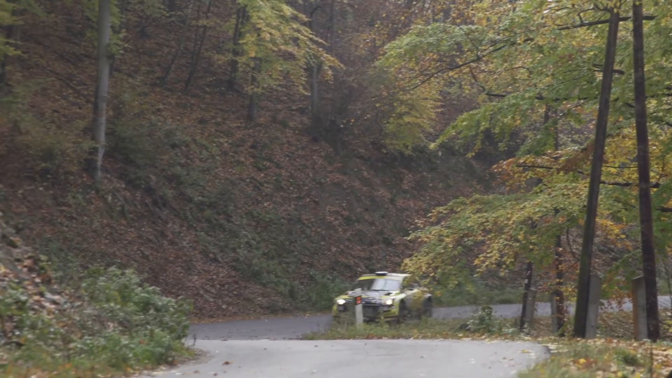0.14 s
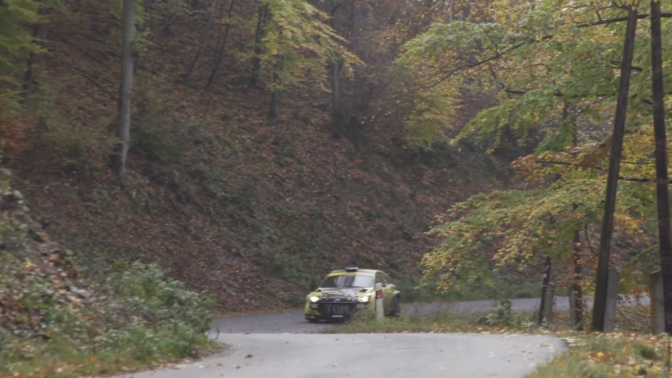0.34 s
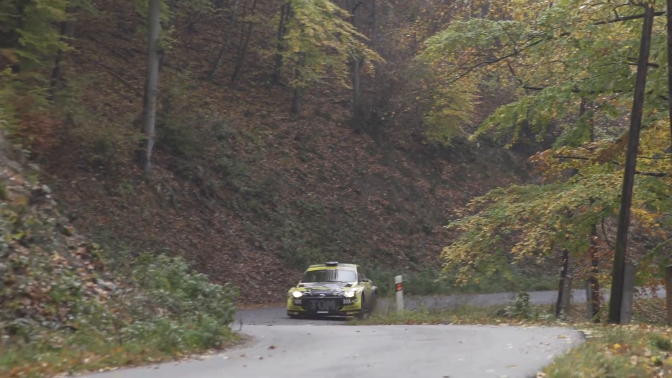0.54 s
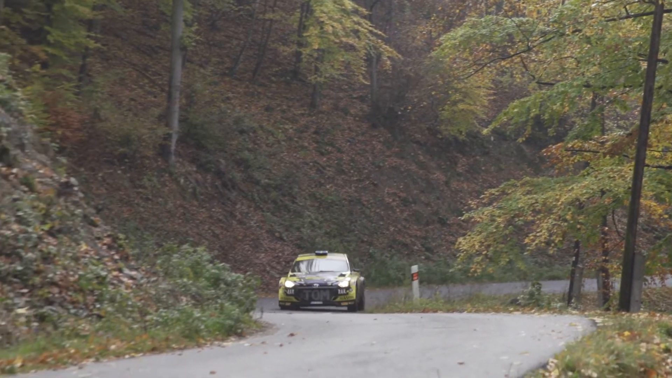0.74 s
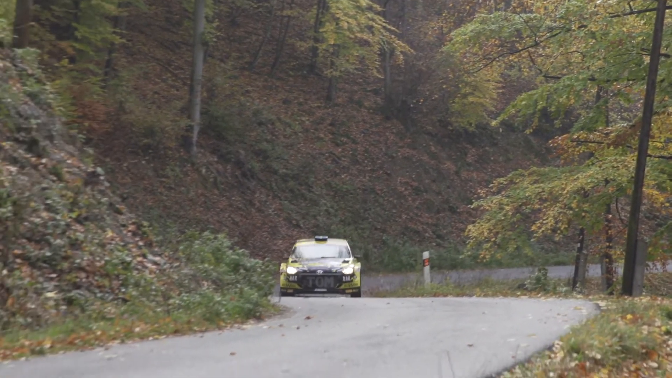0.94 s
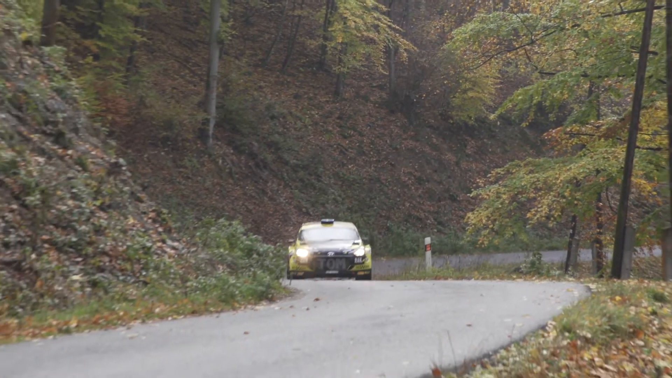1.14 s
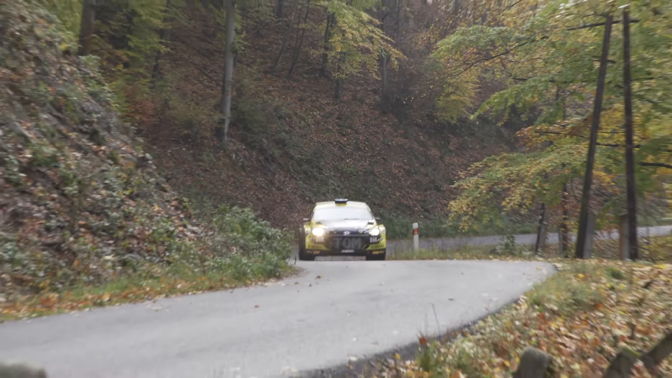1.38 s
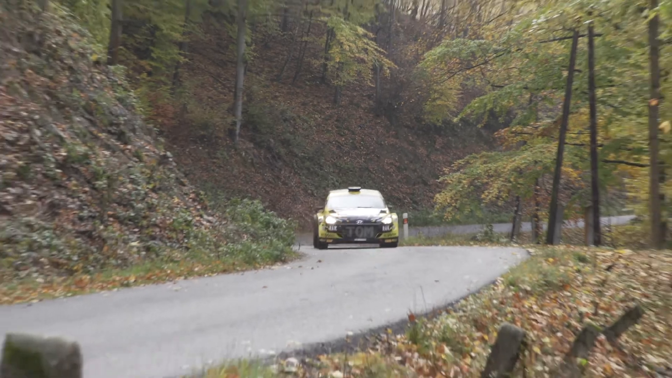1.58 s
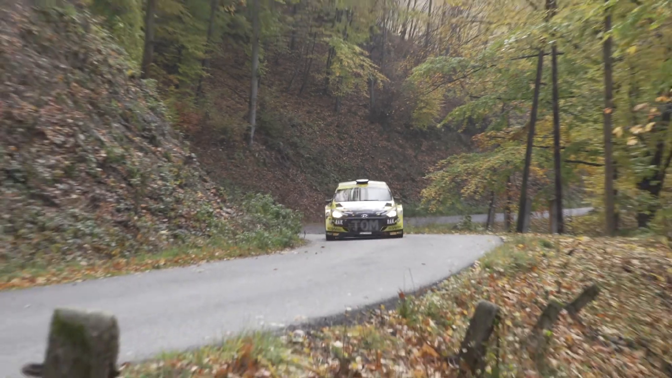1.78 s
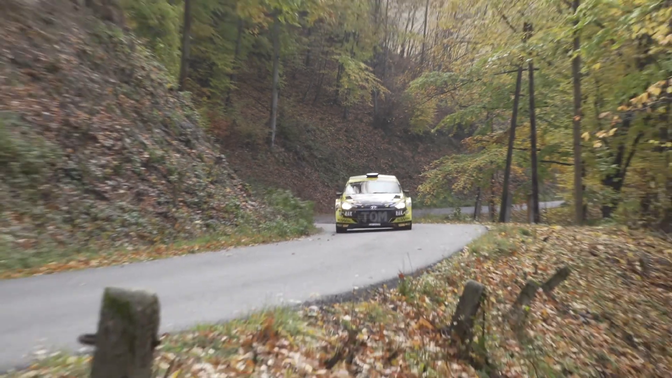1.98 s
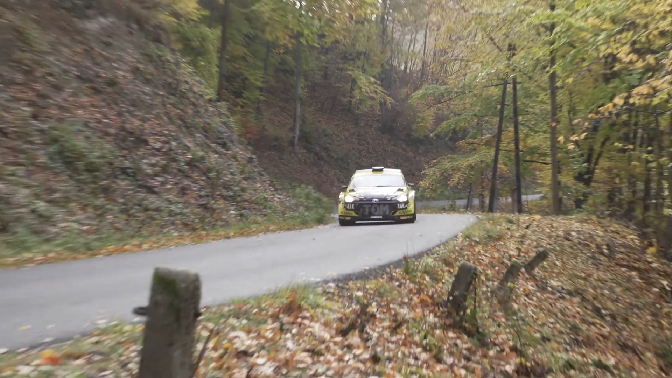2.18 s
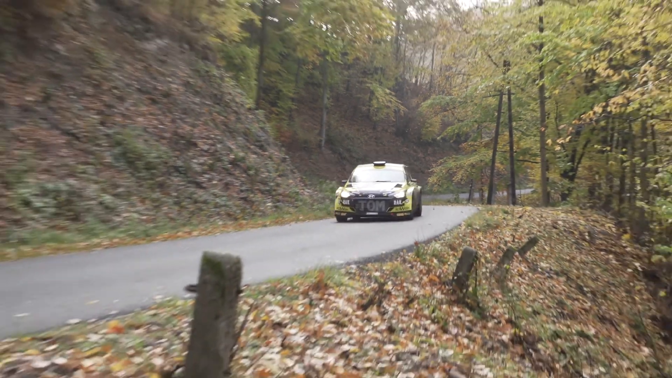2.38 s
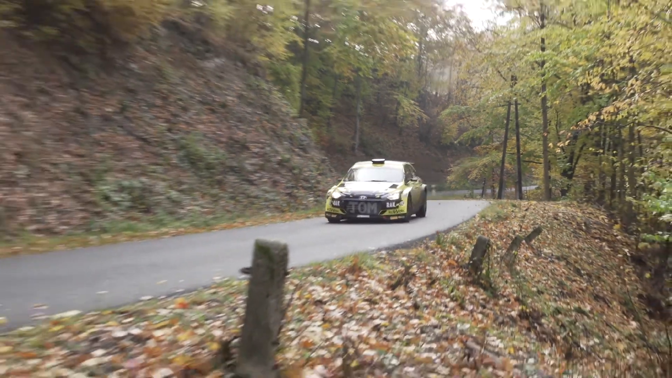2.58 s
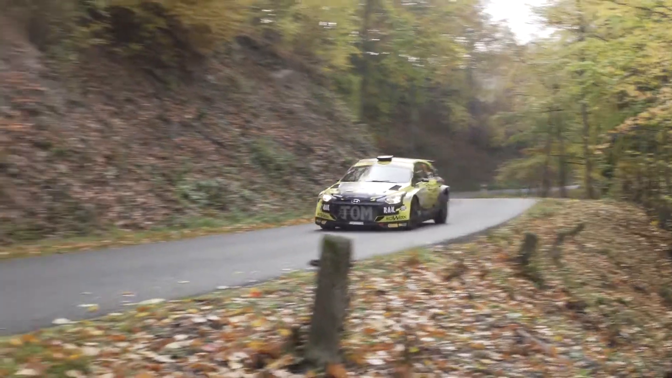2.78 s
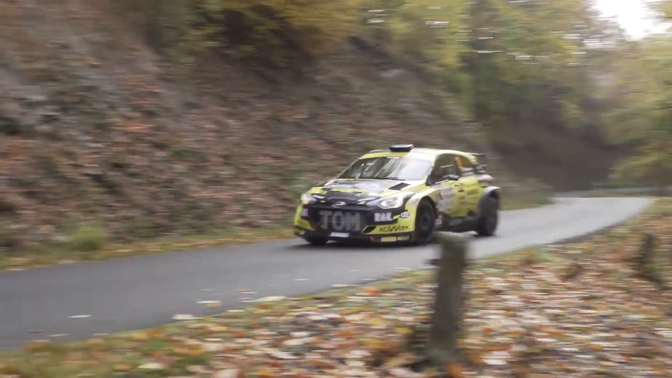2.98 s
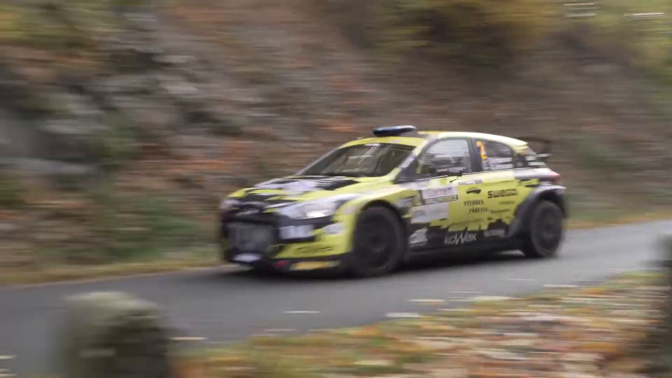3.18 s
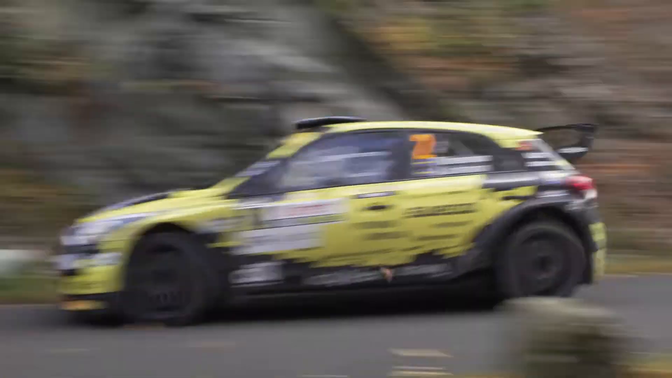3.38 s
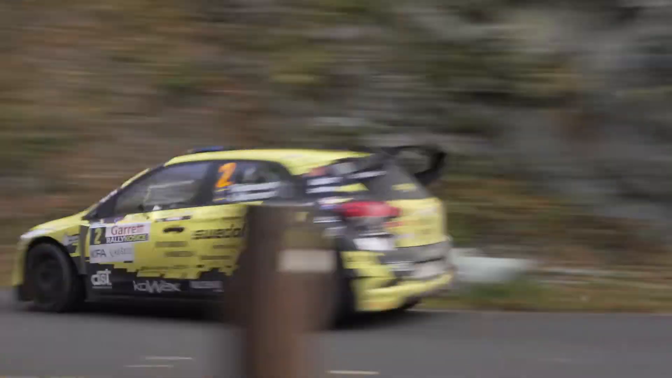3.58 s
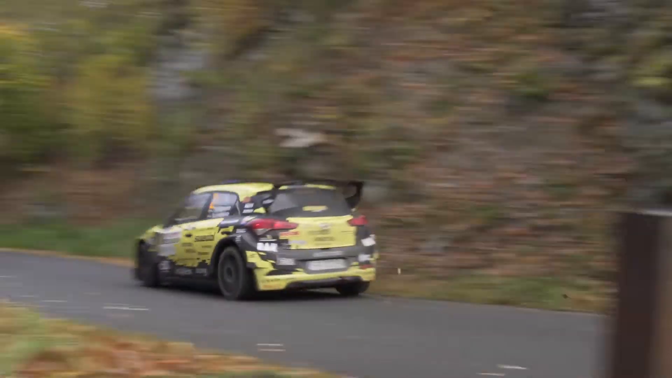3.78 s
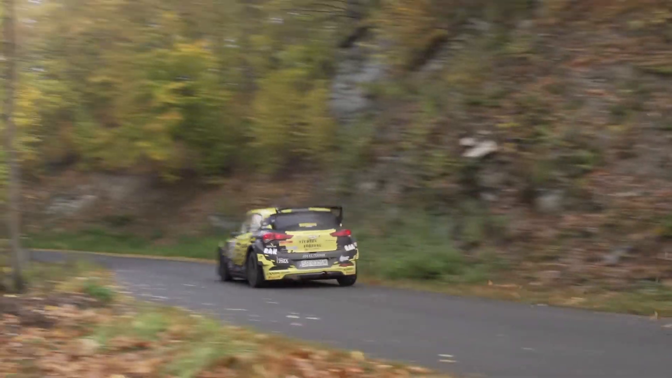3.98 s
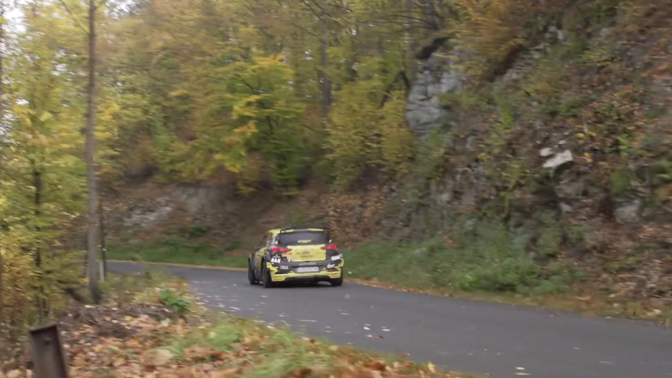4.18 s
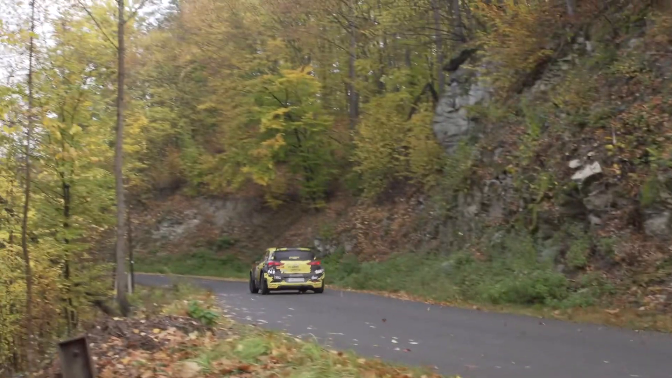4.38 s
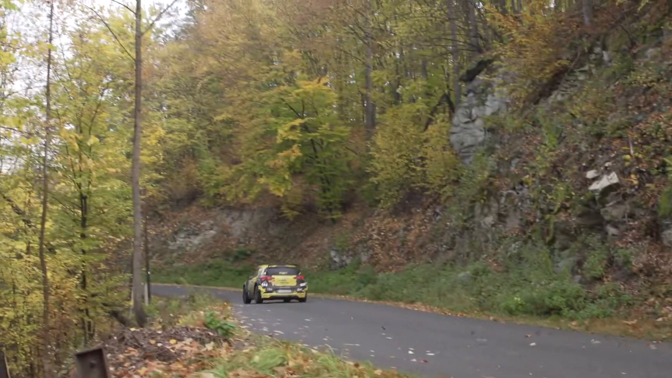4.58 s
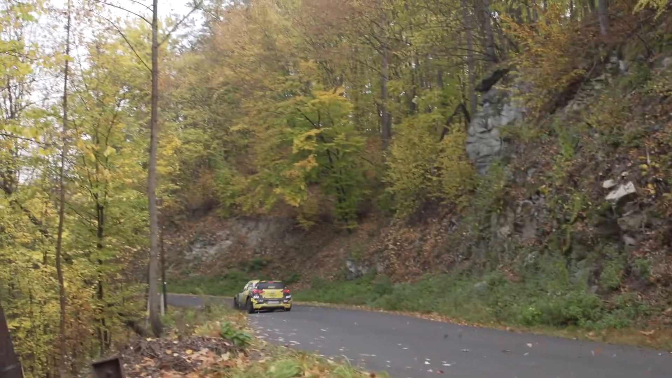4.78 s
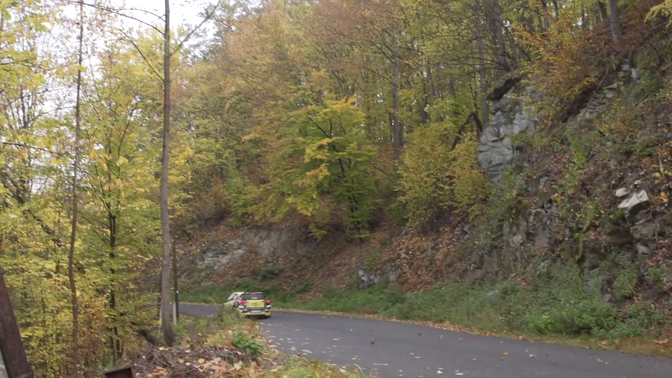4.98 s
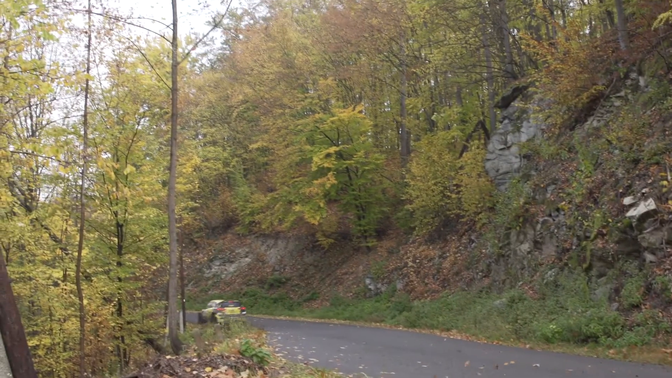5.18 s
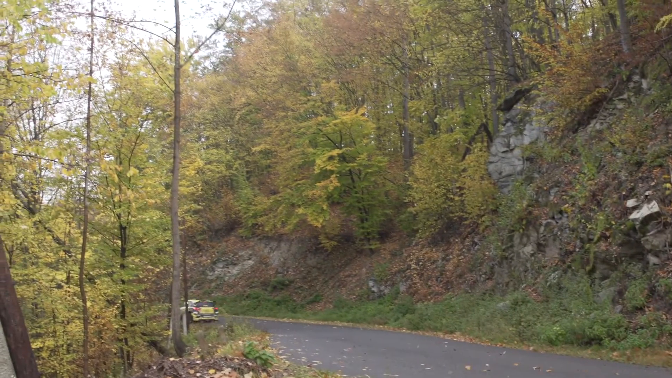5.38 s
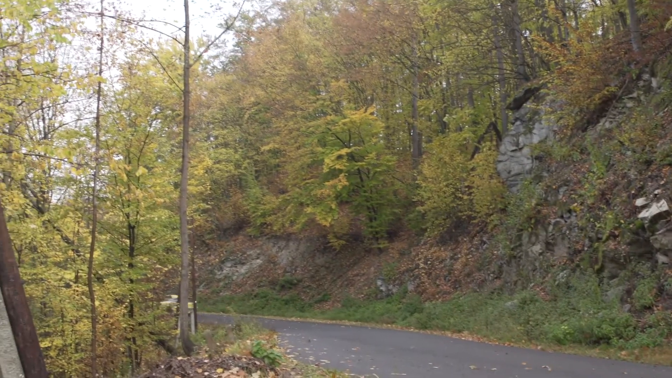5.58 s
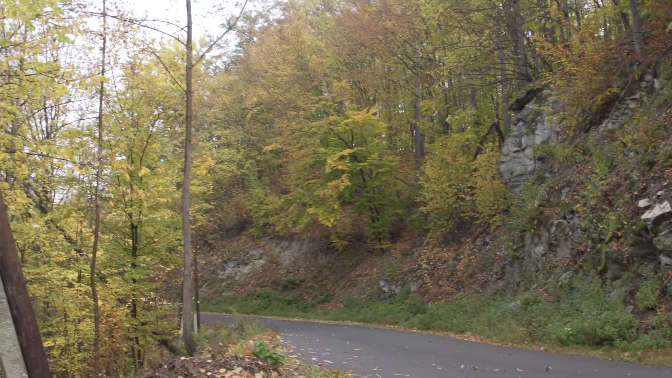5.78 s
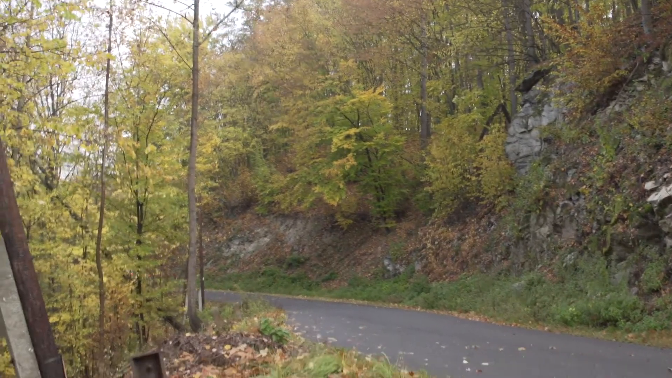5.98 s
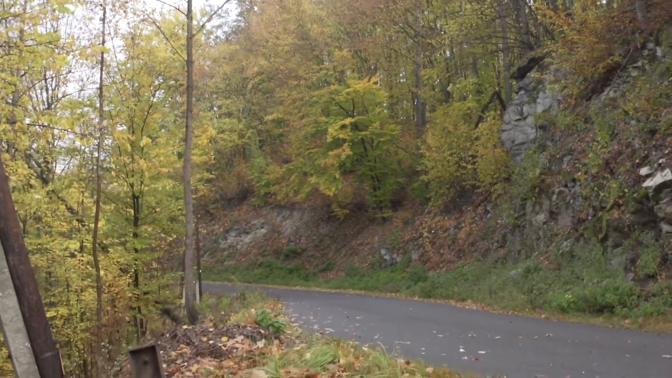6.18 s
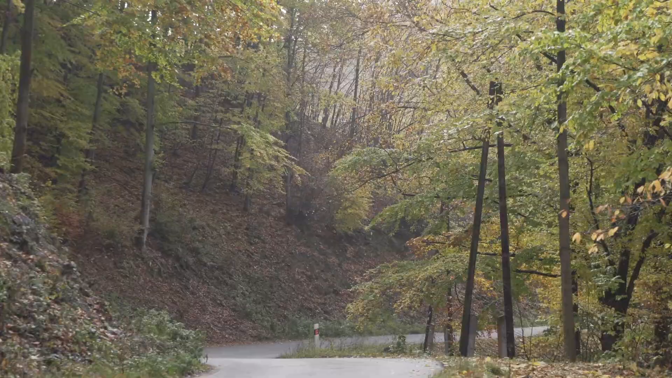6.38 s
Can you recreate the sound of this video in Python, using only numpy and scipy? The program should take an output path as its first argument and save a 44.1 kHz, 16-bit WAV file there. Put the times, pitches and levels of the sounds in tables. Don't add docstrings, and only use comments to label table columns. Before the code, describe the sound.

Outdoors on a damp forest road, a rally car's clean, buzzing engine note rises in the distance with a lower echo from the hillside. It changes gear with a pop and turbo venting, tyres hissing wetly as it nears. It tears past close to the microphone, slightly overloading it, with rapid pops and tailpipe crackle. The darker exhaust note then recedes, with another gear-change pop, before fading away.

```python
import sys
import numpy as np
from scipy import signal
from scipy.fft import rfft, irfft, next_fast_len
from scipy.io import wavfile
from scipy.ndimage import uniform_filter1d, map_coordinates

SR = 44100
rng = np.random.default_rng(int(sys.argv[2]) if len(sys.argv) > 2 else 0)


def makeup_ratio(level_db):
    decades = np.asarray(level_db, float) / 20
    return 10 ** decades


def pcm_store(signal):
    levels = np.round(np.clip(np.atleast_2d(signal), -1, 1) * 32767)
    wavfile.write(sys.argv[1], SR, levels.astype(np.int16).T)


N = 283563
TIME = np.arange(N) / SR


def unit(x):
    return x / np.sqrt(np.mean(x ** 2) + 1e-20)


def curves(rows):
    s, *cols = np.transpose(rows)
    return [np.interp(TIME, s, c) for c in cols]


def wobble(rate):
    coarse = np.arange(0, N + 64, 64)
    knots = rng.standard_normal(int(N * rate / SR) + 5)
    return np.interp(np.arange(N), coarse, map_coordinates(knots, [coarse * rate / SR]))


def hump(s, span, power):
    out = np.zeros(N)
    near = np.arange(max(0, round((s - span) * SR)), min(N, round((s + span) * SR)))
    out[near] = np.exp(-np.abs(2 * (near / SR - s) / span) ** power)
    return out


def bell(s, span):
    return hump(s, span, power=2) ** 2


def plateau(s, span):
    return hump(s, span, power=6)


def turning(middle, change):
    return (1 + np.tanh((TIME - middle) / change)) / 2


def coloured(x, points):
    size = next_fast_len(N + 8192)
    hz, db = np.transpose(points)
    bins = np.log(np.fft.rfftfreq(size, 1 / SR) + 1)
    gain = makeup_ratio(np.interp(bins, np.log(hz), db))
    return unit(irfft(rfft(x, size) * gain, size)[:N])


def patchy(patchy_db, streak_db):
    z = signal.stft(rng.standard_normal(N + 1024), nperseg=1024)[2]

    def field(high, long):
        rough = uniform_filter1d(rng.standard_normal(z.shape), size=high, axis=0)
        return unit(uniform_filter1d(rough, size=long, axis=1))

    gain_db = patchy_db * field(high=12, long=5) + streak_db * field(high=2, long=16)
    return signal.istft(z * makeup_ratio(gain_db), nperseg=1024)[1][:N]


# time in seconds, firing rate in Hz.
ENGINE_SPEED = [(.1, 188.6), (.96, 215.5), (1.35, 224), (1.46, 182), (1.8, 178), (1.92, 161.1),
                (2.14, 166.3), (2.52, 166.3), (2.66, 152.4), (3.48, 150.8), (3.75, 145.7), (4.3, 149.3),
                (4.68, 155.6), (4.93, 156.6), (5.06, 149.9), (5.52, 145.5), (5.88, 150.4), (6.15, 139.4)]
# middle in seconds, length in seconds, level change in
# dB, overshoot in Hz.
GEAR_CHANGES = [
    (1.42, 0.13, 11, -1.5),
    (2.667, 0.099, -10, -6),
    (5.098, .1, -18, 13),
]


def revs():
    lag, length = 0.064, .17
    return curves(ENGINE_SPEED)[0] + sum(hz * bell(s + lag, length) for s, _, _, hz in GEAR_CHANGES)


def order(turn, k, gain, blur, flutter_db, rate=35):
    steepen = .42
    phase = k * (turn + blur * wobble(rate)) + steepen * k * k
    return np.sqrt(2) * gain * makeup_ratio(flutter_db * wobble(21.98)) * np.cos(phase)


# time in seconds, level in dB, bark (overtones over the firing tone) in dB.
PIPE = [(0, -49, -11), (.27, -55, -8), (.6, -46, -11), (1.08, -49, -10), (1.5, -58.5, -0.5),
        (1.95, -45.5, -18), (2.3, -42.5, -9), (2.6, -33, -19), (3.0, -32.5, -17), (3.24, -19, -15.5),
        (3.75, -10, -13), (4.0, -16.5, -11.5), (4.4, -23, -11), (5.04, -23, -18.5), (5.12, -31, -23),
        (5.9, -36, -18), (6.1, -57, -8), (6.32, -46, -9)]
# order, level over the bark in dB.
LOWER = [(2, 2.5), (3, -2), (4, -2)]
# order, level over the bark in dB.
UPPER = [(5, -15), (6, -16), (7, -17), (8, -18), (9, -17), (10, -18), (11, -19), (12, -20), (13, -20),
         (14, -21), (15, -22), (16, -23)]
# middle in seconds, length in seconds, order, level in dB.
SWELLS = [(1.681, 0.12, 1, -48), (.85, .5, 4, -63), (2.398, 0.53, 3, -49.5), (2.351, 0.38, 2, -52),
          (2.976, 0.35, 3, -43.5), (3.143, 0.23, 4, -30), (3.17, 0.13, 2, -36.5), (3.467, 0.098, 2, -24),
          (3.703, 0.11, 2, -26), (3.377, 0.22, 3, -34), (3.624, 0.48, 4, -22), (3.744, 0.4, 3, -25),
          (4.152, 0.27, 4, -29.5), (4.139, 0.34, 3, -31.5), (4.15, 0.32, 2, -40), (4.79, .15, 1, -50),
          (5.196, 0.11, 2, -57), (5.855, 0.34, 4, -46), (5.902, 0.46, 3, -55), (6.262, .3, 2, -50.5),
          (6.25, 0.48, 3, -54.5)]
# middle in seconds, length in seconds, order, level in dB.
GLINTS = [(1.0, .5, 6, -54), (2.47, .3, 5, -50), (3.12, .3, 6, -43), (3.14, .2, 8, -42), (3.35, .2, 8, -34),
          (3.64, .28, 6, -34), (3.6, .22, 9, -31), (3.62, .25, 10, -37), (3.98, .5, 5, -29),
          (3.86, .3, 7, -38), (4.02, .3, 6, -38), (4.15, .3, 14, -45), (4.55, .5, 6, -40),
          (4.5, .4, 9, -46), (4.6, .4, 15, -49), (5.64, .22, 8, -49), (5.68, .3, 7, -55),
          (5.82, .35, 5, -48), (5.7, .14, 13, -43), (5.8, .22, 12, -49), (5.7, .2, 18, -51)]


def exhaust():
    overtone_cut = 0.14
    fading_db = 2.5
    far_db, far_blur = -28, .004
    turn = 2 * np.pi * np.cumsum(revs()) / SR + 0.071 * wobble(60)
    level_db, bark_db = curves(PIPE)
    cut_db = sum(db * plateau(s, span) for s, span, db, _ in GEAR_CHANGES)
    tone_db = level_db + cut_db
    smear = far_blur * np.clip(far_db - level_db, 0, None)
    overtone_db = level_db + bark_db + overtone_cut * cut_db

    lower = {1: makeup_ratio(tone_db)}
    for k, db in LOWER:
        lower[round(k)] = makeup_ratio(overtone_db + db + fading_db * wobble(7))
    lower[2] = lower[2] * makeup_ratio(7.04 * turning(3.424, .12))
    for s, span, k, db in SWELLS:
        lower[round(k)] = lower[round(k)] + makeup_ratio(db) * bell(s, span)
    upper = {k: makeup_ratio(overtone_db + db) for k, db in UPPER}
    for s, span, k, db in GLINTS:
        upper[k] = upper.get(k, 0) + makeup_ratio(db) * bell(s, span)

    low = sum(order(turn, k, gain, blur=.06 + smear, flutter_db=.6 + .5 * k) for k, gain in lower.items())
    high = sum(order(turn, k, gain, blur=.09, flutter_db=2.2, rate=90) for k, gain in upper.items())
    half = sum(order(turn, k / 2, makeup_ratio(tone_db - 35.0), blur=0.43, flutter_db=-5.0) for k in range(3, 10, 2))
    return low + high + half, turn


# time in seconds, car speed away from the slope in m/s, level in dB,
# brightness in dB per order.
ECHO = [(.1, 17.5, -58, 0.5), (.55, 16, -53.5, 3.5), (1.0, 28, -54, 3.5), (1.3, 23.2, -51.5, -2),
        (1.6, 14, -54.5, 3), (1.8, 18, -57, 8), (2.15, 19, -57, 2.5), (2.5, 19.4, -45.5, 2),
        (2.8, 12.2, -51, 0)]
# order, level in dB.
ECHO_ORDERS = [(1, 2.5), (2, 0.5), (3, 0.5)]


def hillside():
    delay, sound_speed = .06, 343
    gone = (3.72, ECHO[-1][1], -60, 0)
    speed, level_db, bright_db = curves(list(ECHO) + [gone])
    late = np.interp(np.arange(N) - delay * SR, np.arange(N), revs())
    lowered = late * (sound_speed - speed) / (sound_speed + speed)
    turn = 2 * np.pi * np.cumsum(lowered) / SR
    out = np.zeros(N)
    for k, db in ECHO_ORDERS:
        gain = makeup_ratio(level_db + db + (k - 2) * bright_db + 1.5 * wobble(6))
        out += order(turn, round(k), gain, blur=.5, flutter_db=2.2)
    return out


# time in seconds, roar in dB, wetness in dB.
ROAD = [(.05, -44.5, 1), (.28, -51, -9), (.5, -50, -4), (1.1, -45, -6), (1.73, -43, -15),
        (1.76, -44.5, 7.5), (2.2, -41, 10.5), (2.99, -38, 10), (3.24, -28, -3), (3.55, -22, -2),
        (3.9, -24, -1), (4.1, -31, 4.5), (5.0, -38, 3.5), (5.13, -45.5, -1), (5.55, -48.5, 8),
        (5.7, -42.5, 7), (5.97, -41.5, -0.5), (6.09, -50, -2)]
# middle in seconds, length in seconds, hiss change in dB.
TYRE_DIPS = [
    (1.84, 0.024, -4),
    (1.942, 0.058, -5.5),
    (2.675, .025, -6),
    (2.777, 0.032, -8),
    (3.001, 0.027, -4.5),
]


def road_levels():
    roar_db, wet_db = curves(ROAD)
    dip_db = sum(db * plateau(s, span) for s, span, db in TYRE_DIPS)
    return roar_db, wet_db, dip_db


# frequency in Hz, level in dB.
ROAR = [(60, -58.5), (170, 7), (265, -7.5), (420, 1.5), (800, -0.5), (1050, -4.5), (1500, 1), (2500, -4),
        (4200, -7), (5200, -17), (6200, -34.5), (8800, -28), (10000, -48), (16000, -64)]


def tyre_roar(turn):
    roar_db, _, dip_db = road_levels()
    level_db = roar_db + 0.59 * dip_db
    gate = 1 + .18 * np.cos(turn + 1.5)
    noise = coloured(gate * patchy(patchy_db=0.16, streak_db=2.5), ROAR)
    return noise * makeup_ratio(level_db + 2 + 0.37 * wobble(9))


# frequency in Hz, level in dB.
HISS = [(4000, -51), (6200, -8), (7500, -2), (9000, 0.5), (10200, -9.5), (11700, -3.5), (12600, -10.5),
        (16000, -9.5)]
# middle in seconds, length in seconds, change in dB.
SPRAY_CHANGES = [
    (1.997, 0.053, -9),
    (2.075, .025, -6),
    (2.39, .15, -6),
    (2.87, 0.058, -4),
    (3.359, 0.17, -3),
    (3.607, .05, 1.5),
    (3.87, 0.13, -1.5),
]


def spray_hiss():
    roar_db, wet_db, dip_db = road_levels()
    change_db = sum(db * plateau(s, span) for s, span, db in SPRAY_CHANGES)
    hiss_db = -10 + 1.528 * roar_db + wet_db + dip_db + change_db
    grit = makeup_ratio(3.1 * rng.standard_normal(N) + 0.98 * wobble(120))
    spray = coloured(grit * patchy(patchy_db=1.0, streak_db=2.0), HISS)
    dull = signal.lfilter(*signal.butter(2, 10000 / (SR / 2)), spray)
    away = turning(4.15, .35)
    return (spray + away * (dull - spray)) * makeup_ratio(hiss_db + 5.0 + (2 - away) * wobble(39))


# frequency in Hz, level in dB.
RUMBLE = [(15, -24), (40, -3), (70, 0.5), (110, 6), (200, -51)]
# middle in seconds, length in seconds, level in dB.
BUMPS = [(0.028, 0.17, -54.5), (1.425, .15, -59), (1.82, 0.09, -50), (1.936, 0.086, -50), (2.645, .12, -51),
         (2.743, .1, -46), (2.811, .12, -48), (2.975, .1, -46), (3.25, .2, -56), (3.417, .15, -43),
         (3.55, .15, -39.5), (3.7, 0.22, -40), (4.06, .15, -44), (4.71, 0.053, -61), (4.904, 0.063, -59),
         (5.118, .12, -42), (5.4, 0.33, -62), (5.613, .12, -53), (6.069, 0.13, -58), (6.269, .1, -62)]


def rumble():
    roar_db = curves(ROAD)[0]
    buffeting = makeup_ratio(roar_db / 2 - 44.5 + 1.6 * wobble(14))
    thumps = sum(makeup_ratio(db) * bell(s, span) for s, span, db in BUMPS)
    return coloured(rng.standard_normal(N), RUMBLE) * (buffeting + thumps)


# start in seconds, peak in dB, ring in Hz.
POPS = [(1.41, -31, 900), (3.543, -17, 1500), (3.557, -20, 1400), (3.57, -20, 1500), (5.065, -26, 300),
        (5.088, -33, 220), (5.112, -34, 250), (5.135, -32, 280), (5.19, -36, 260), (5.655, -41, 3000),
        (6.183, -31.5, 650)]


def pops():
    out = np.zeros(N + SR)
    t = np.arange(SR // 20) / SR
    for s, db, hz in POPS:
        ring = -np.sin(2 * np.pi * hz * t) * makeup_ratio(-60 * t * hz / 6)
        puff = signal.lfilter(*signal.butter(4, 1.3 * hz / (SR / 2)), rng.standard_normal(len(t)))
        puff = puff * makeup_ratio(-60 * t / .04)
        onset = 1 - np.exp(-3 * t * hz)
        out[round(s * SR):][:len(t)] += makeup_ratio(db) * (2 * ring + puff) * onset
    return out[:N]


# middle in seconds, length in seconds, level in dB.
VENTS = [
    (1.42, .08, -47),
    (1.796, 0.078, -38),
    (1.975, .03, -56),
    (2.581, .16, -36),
    (2.649, .03, -43),
    (2.751, 0.059, -51),
]
# frequency in Hz, width in Hz, level in dB.
VALVE = [(1640, 440, 0.1), (2450, 250, -6), (3170, 400, -7)]


def valve():
    air = rng.standard_normal(N) * makeup_ratio(1.5 * wobble(60))
    pipe = sum(makeup_ratio(db) * signal.filtfilt(*signal.iirpeak(hz, hz / width, SR), air) for hz, width, db in VALVE)
    return unit(pipe) * sum(makeup_ratio(db) * bell(s, span) for s, span, db in VENTS)


# start in seconds, end in seconds, multiple of the firing rate, level in dB.
WHINE = [
    (1.51, 1.69, 17.15, -49.5),
    (2.06, 2.52, 17.0, -52),
    (2.03, 2.6, 25.5, -51),
    (2.85, 3.1, 25.6, -50),
]


def gearbox():
    turn = 2 * np.pi * np.cumsum(revs()) / SR
    out = np.zeros(N)
    for start, end, k, db in WHINE:
        load = np.clip(np.minimum(TIME - start, end - TIME) / .05, 0, 1)
        out += load * makeup_ratio(db + 2.5 * wobble(20)) * np.sin(k * turn + .6 * wobble(50))
    return out


# time in seconds, level in dB.
CRACKLE = [(3.0, -60.5), (3.35, -54), (3.5, -42), (3.6, -28), (3.7, -37.5), (3.9, -42), (4.101, -43.5),
           (4.5, -66.5), (5.0, -91)]
# frequency in Hz, level in dB.
SHOCK = [(700, -34.5), (1500, -8.5), (4500, 10), (6500, -3), (10000, -8.5), (16000, -33)]


def crackle(turn):
    front = turn + 2.0
    firings = front / (2 * np.pi)
    sizes = makeup_ratio(2 * rng.standard_normal(int(firings[-1]) + 3))
    burst = sizes[np.round(firings).astype(int)] * np.exp(5 * (np.cos(front) - 1))
    level_db = curves([(0, -92), (2.8, -90)] + list(CRACKLE))[0]
    return coloured(burst * rng.standard_normal(N), SHOCK) * makeup_ratio(level_db)


def scene():
    engine, turn = exhaust()
    tyres = tyre_roar(turn) + spray_hiss() + rumble()
    return (engine + hillside() + tyres + pops() + valve() + gearbox() + crackle(turn))[None]


def top_cut(x):
    return signal.sosfilt(signal.butter(12, 15740, fs=SR, output="sos"), x)


def record(dry):
    top, cut_s = .33, 6.353
    x = dry / (1 + np.abs(dry / top) ** 8) ** (1 / 8)
    x = signal.lfilter(*signal.butter(1, 12 / (SR / 2), "high"), x)
    fade = np.clip((cut_s - TIME) / 0.0078, 0, 1)
    hush = makeup_ratio(-68) * coloured(rng.standard_normal(N), ROAR)
    return top_cut(x * fade + (1 - fade) * hush)


dry = scene()
out = record(dry)
pcm_store(out)
```